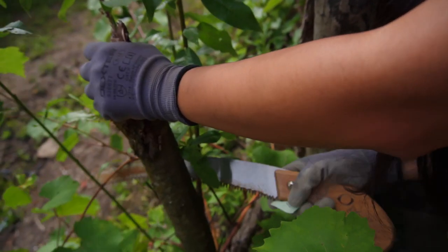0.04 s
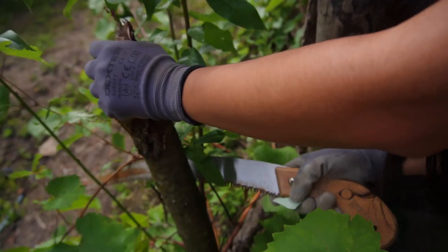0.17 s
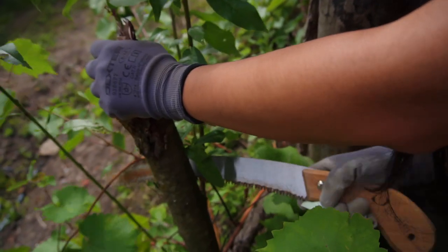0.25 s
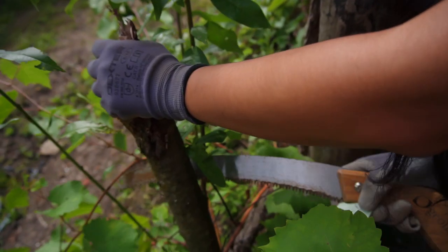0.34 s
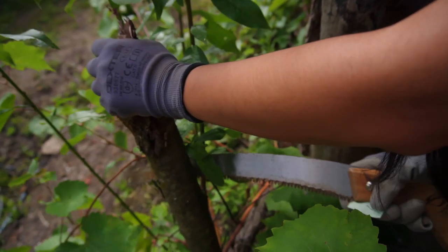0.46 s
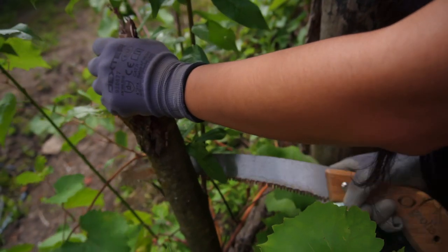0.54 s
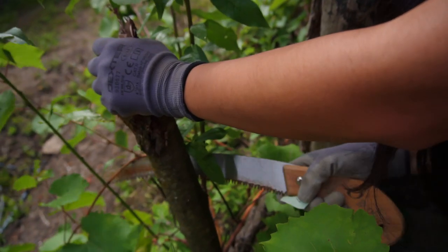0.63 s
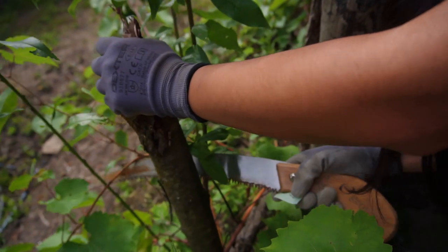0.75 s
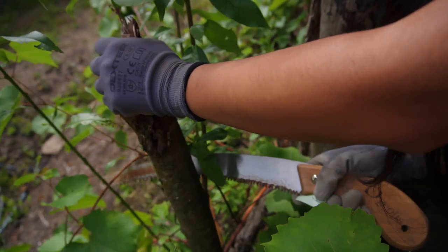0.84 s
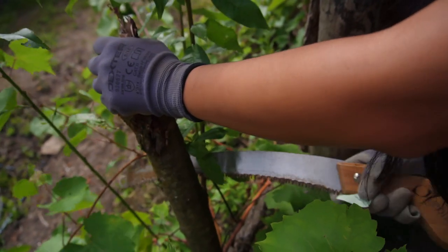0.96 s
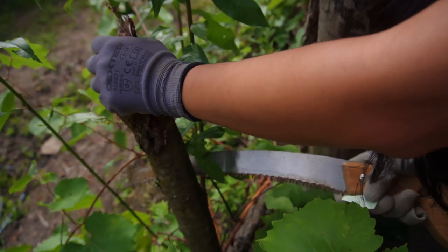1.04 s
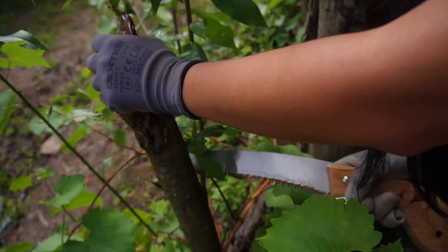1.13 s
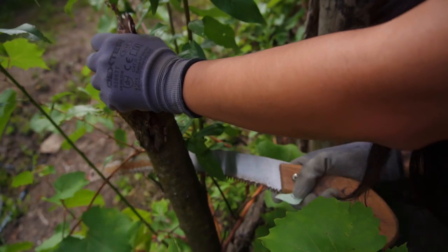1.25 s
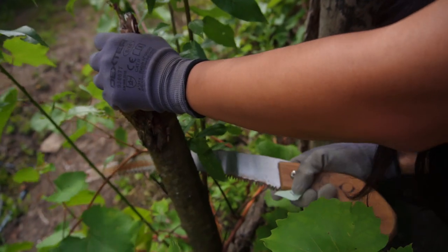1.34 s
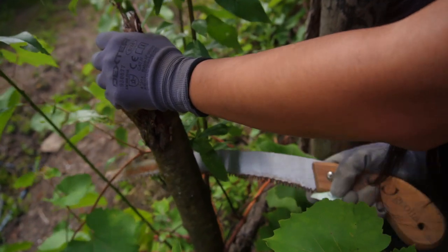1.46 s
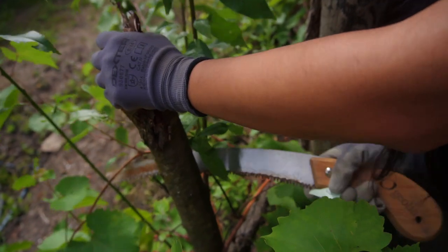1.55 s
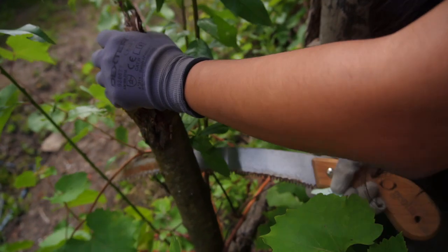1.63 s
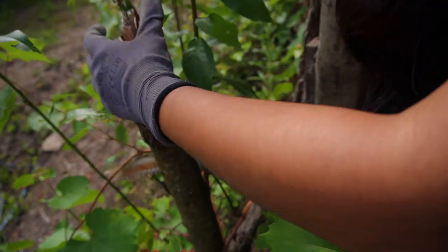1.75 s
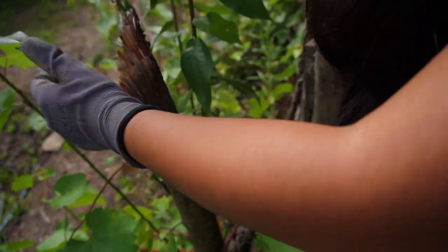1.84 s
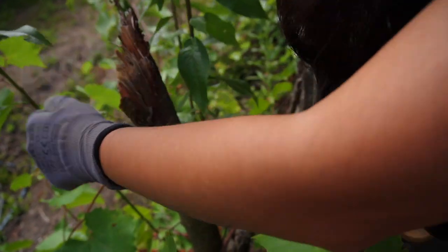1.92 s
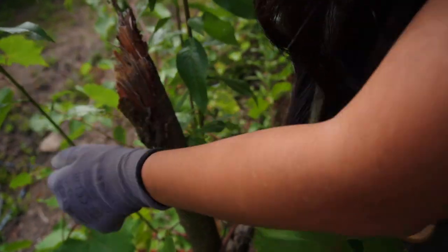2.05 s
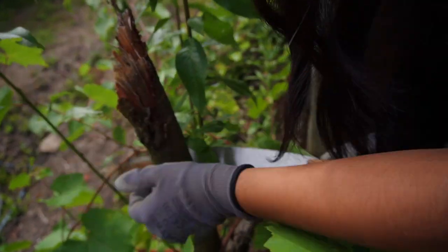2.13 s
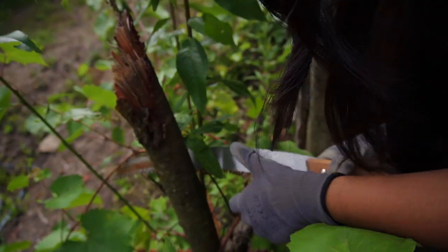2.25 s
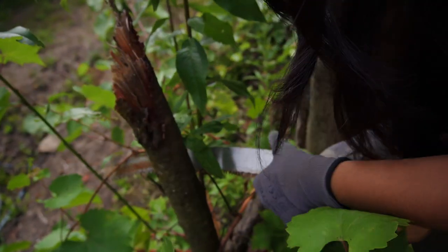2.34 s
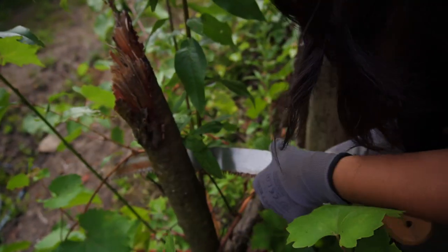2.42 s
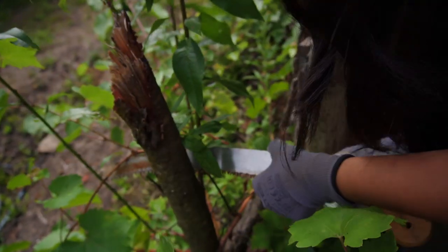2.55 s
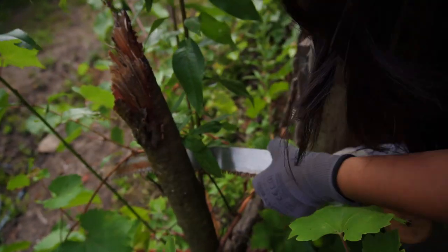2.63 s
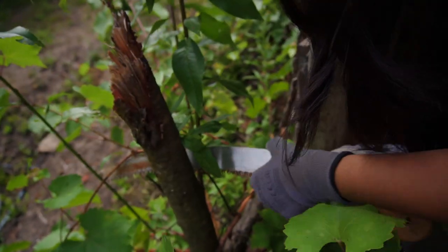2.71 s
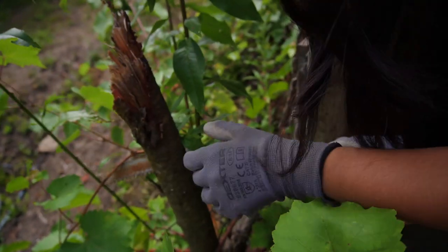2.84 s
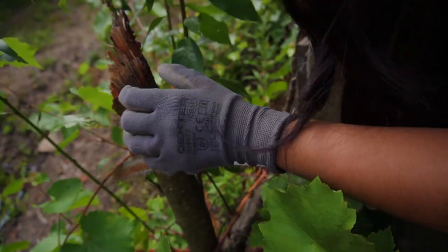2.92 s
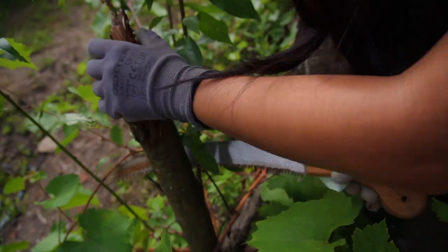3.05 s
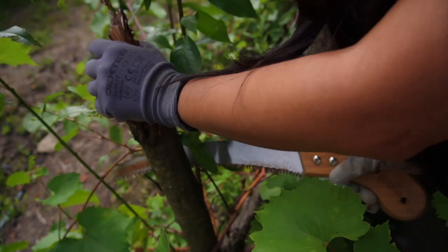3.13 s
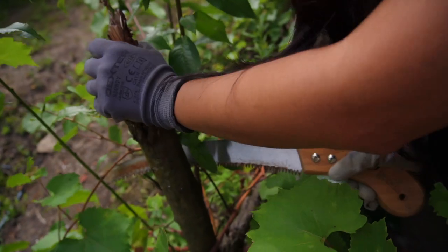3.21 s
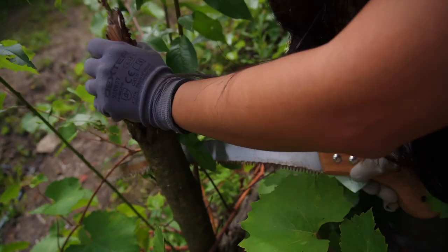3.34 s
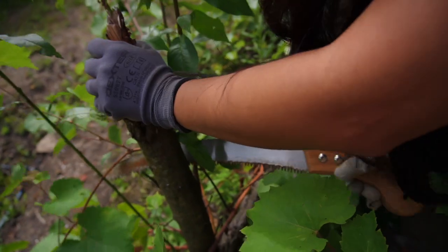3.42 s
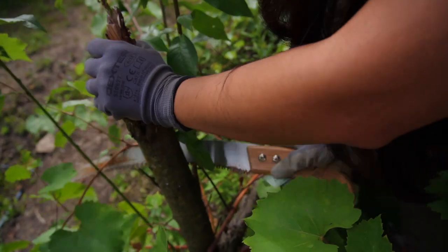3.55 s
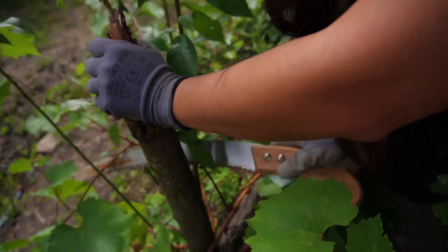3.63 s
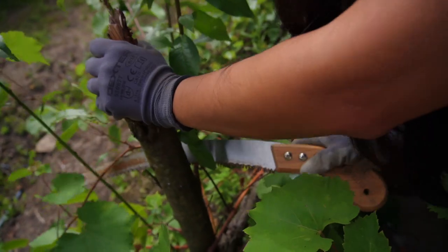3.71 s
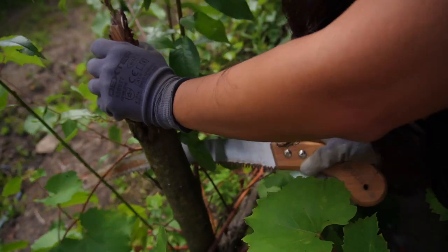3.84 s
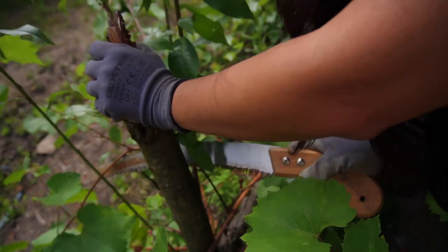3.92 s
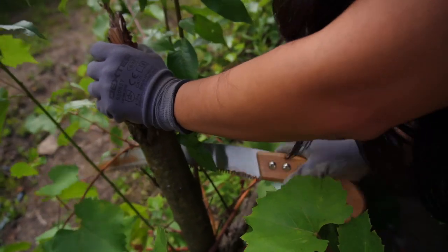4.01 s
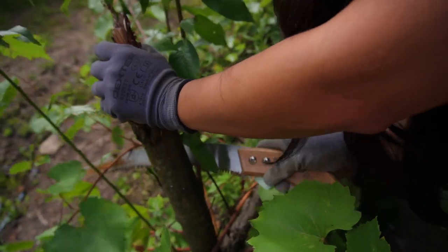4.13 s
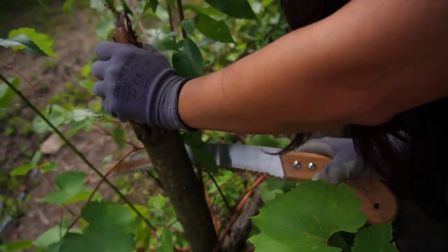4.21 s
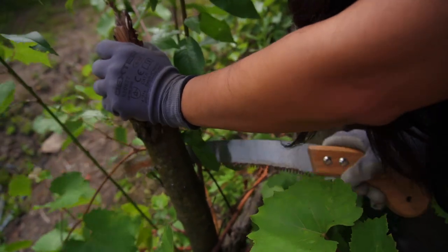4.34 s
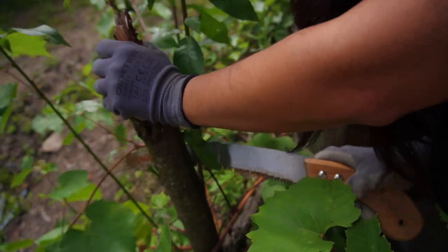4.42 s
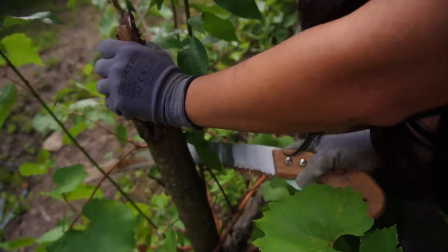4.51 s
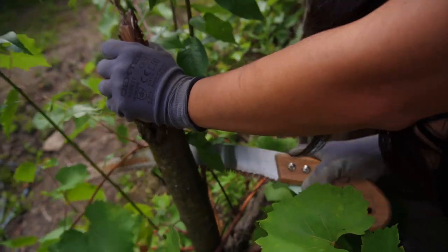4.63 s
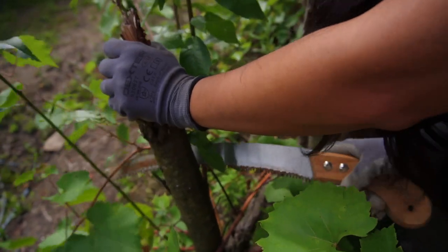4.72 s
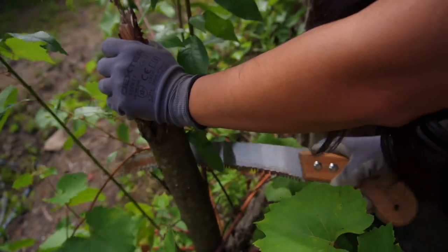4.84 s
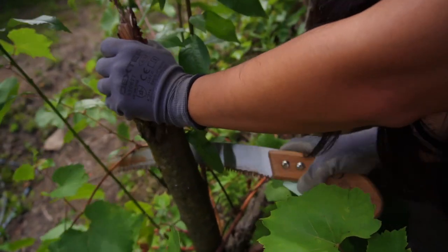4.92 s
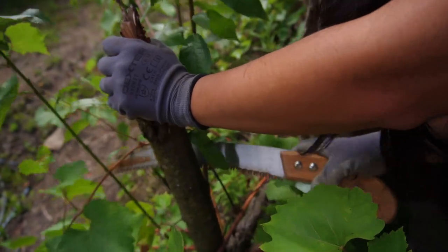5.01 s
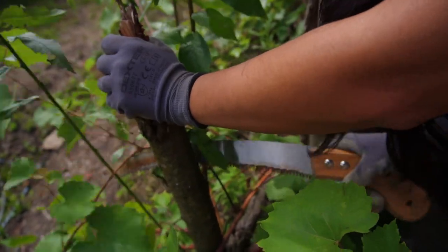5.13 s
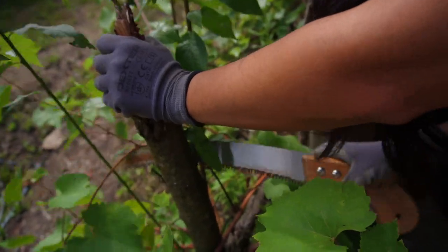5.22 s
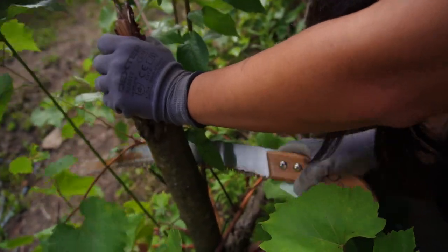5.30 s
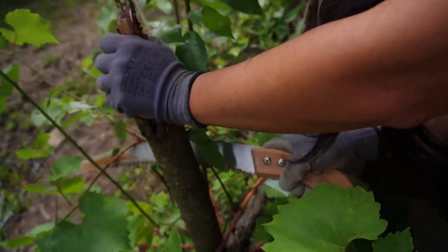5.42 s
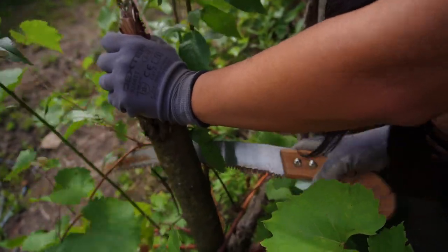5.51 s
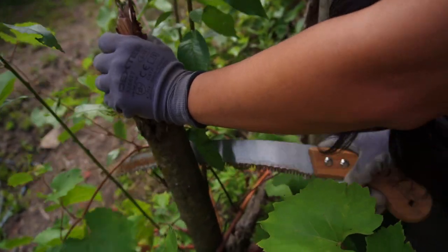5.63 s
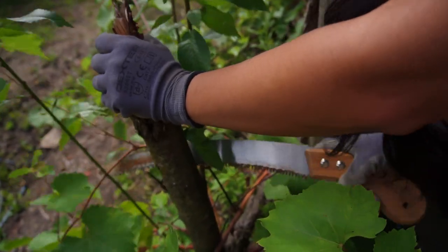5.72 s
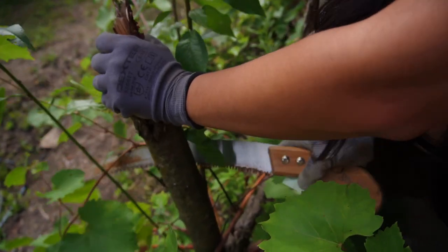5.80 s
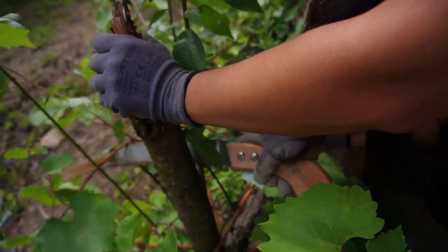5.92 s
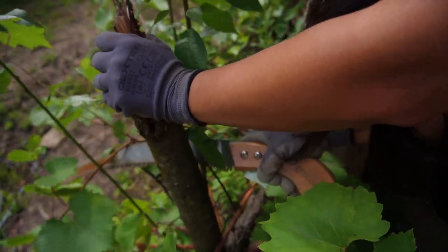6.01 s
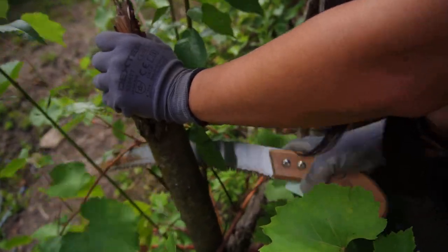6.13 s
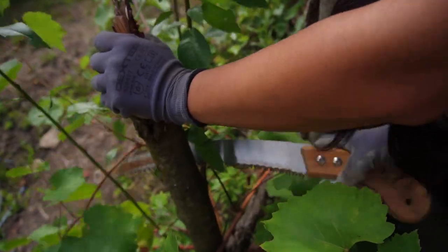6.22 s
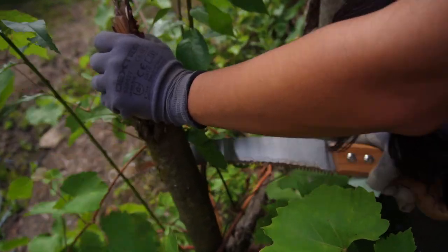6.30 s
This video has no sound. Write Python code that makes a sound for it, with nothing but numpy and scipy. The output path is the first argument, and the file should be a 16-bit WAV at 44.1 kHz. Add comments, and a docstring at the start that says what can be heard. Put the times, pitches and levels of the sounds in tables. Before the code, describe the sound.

A hand saw rasps back and forth through a thin tree trunk, about three strokes a second, with woody knocks and a faint ring from the blade. The sawing pauses while a glove brushes bark and leaves, twigs snap and the blade scrapes once against a twig. Then the quick strokes resume, slightly louder. The microphone is close, in a quiet orchard with faint open air behind.

```python
"""Quick strokes of a hand saw in a thin trunk, close to a mono camera microphone in a quiet orchard.
The teeth catch and let go many times a second; each catch throws out a burst of rasp, rings the blade
and thuds in the wood. In a pause a gloved hand brushes bark and leaves, twigs snap and the idle blade
scrapes a twig; then the sawing goes on. Faint open air lies behind it all."""
import sys
import numpy as np
from scipy import signal
from scipy.io import wavfile
from scipy.ndimage import uniform_filter1d

SR = 44100
rng = np.random.default_rng(int(sys.argv[2]) if len(sys.argv) > 2 else 0)


def generate_wav(signal):
    """Clip the signal to [-1, 1] and save it as 16-bit WAV at the path in sys.argv[1]."""
    frames = np.transpose(np.atleast_2d(signal))
    scaled = np.clip(frames, -1, 1) * 32767
    pcm = np.round(scaled).astype(np.int16)
    wavfile.write(sys.argv[1], SR, pcm)


N = 280512

# spectra of the open air, brushed leaves and rasping teeth: frequency_hz, relative_db
AIR_SPECTRUM = [(8.8, -1.5), (15, 2), (34, -6.5), (59, -20), (294, -17), (330, -43), (371, -15),
                (840, -26.5), (944, -22), (11000, -40.5), (16000, -49)]
LEAF_SPECTRUM = [(300, -31), (650, -1), (1330, 12.5), (2050, 9), (3500, 8), (8990, 2), (10800, -4.5),
                 (14200, -1.5), (16000, -19.5)]
RASP_SPECTRUM = [(530, -25), (900, -3), (967, -4), (1200, -6), (1460, -1), (3260, -5), (4800, -3),
                 (7230, -6.5), (8450, -4), (10500, -14.5), (13800, -10), (16000, -23)]
# modes of the blade and the trunk: pitch_hz, width_hz, relative_db
BLADE_MODES = [(1370, 130, -0.5), (2002, 150, 2.5), (2940, 370, -6), (4955, 110, 2), (5650, 150, 3.5),
               (6660, 71, 0.5), (7900, 140, -22), (8750, 1200, -1.5)]
TRUNK_MODES = [(120, 110, -5), (184, 65, -1.5), (229, 63, -1), (320, 95, 1.5), (465, 103, -1),
               (619, 167, 2), (706, 177, -3.5), (1260, 770, -1)]
# glove on bark and leaves: start_s, rise_s, hold_s, fall_s, level_db, swell_db, dullness_db
GLOVE_BRUSHES = [(1.55, 0.024, 0.8, .2, -62.5, -0.5, -7), (2.6, .05, .15, .05, -63, 1.5, -9),
                 (1.62, 0.13, 0.056, 0.16, -47, -1, -9.5), (2.152, 0.014, 0.048, 0.22, -49, -0.5, -10.5),
                 (2.33, .25, .09, .07, -49.5, -1, -7.5), (2.76, 0.068, 0.021, 0.015, -44.5, 4, -7.5),
                 (2.85, 0.048, 0.096, 0.0084, -56.5, 0.5, -7.5),
                 (2.915, 0.017, 0.0083, 0.063, -51.5, -2, -1), (2.99, 0.03, 0.0065, 0.0051, -49, 7, -14),
                 (3.07, 0.034, 0.047, 0.13, -41.5, -10.5, -8), (3.07, 0.03, 0.28, 0.029, -63, -3.5, -12)]
# twig snaps and hard bites: start_s, body_peak_db, pitch_hz, crack_over_body_db
SNAPS_AND_BITES = [(0.267, -33, 4100, -10), (0.363, -30.5, 730, -16), (0.689, -27.5, 1100, -5),
                   (0.913, -28, 695, -8), (0.964, -29.5, 432, 1), (1.484, -35, 400, -11),
                   (1.502, -33, 600, -24), (1.52, -28, 710, -24), (1.752, -37.5, 4300, 6),
                   (1.776, -29, 1520, 0), (1.801, -38, 2600, 8), (1.817, -31.5, 4875, 8),
                   (1.824, -28, 1540, 3.5), (1.844, -41, 1580, -9), (2.015, -39, 1560, 1.5),
                   (2.021, -35.5, 2400, 2), (2.164, -41.5, 880, 1), (2.224, -45, 1480, 1),
                   (2.285, -47, 3400, -7), (2.34, -52, 1700, -8), (2.413, -46.5, 2330, 3),
                   (2.444, -52, 1920, 3), (2.824, -31, 4500, 1), (2.896, -43.5, 890, -18),
                   (2.933, -31, 3180, -3), (2.939, -34, 3186, -14), (2.991, -42.5, 5270, -1),
                   (3.077, -42, 1810, 9), (3.159, -43, 3560, 7), (3.253, -54.5, 2980, 4),
                   (3.35, -28.5, 1270, -10), (3.36, -33, 1290, -12), (3.595, -27, 1000, -1),
                   (3.695, -32.5, 4500, -1), (3.713, -32.5, 334, -8), (3.771, -30, 716, -8),
                   (3.986, -43, 890, -5), (4.221, -29, 800, -14), (4.26, -35, 4200, -3),
                   (4.27, -29.5, 4120, -3), (4.591, -32.5, 690, -18), (4.924, -37.5, 726, -12),
                   (5.062, -30.5, 1320, -7), (5.075, -30.5, 815, -8), (5.119, -33.5, 910, -7),
                   (5.178, -36.5, 664, -14), (5.258, -33.5, 1150, 6.5), (5.293, -38, 5000, -8),
                   (5.526, -23.5, 1030, -12), (5.549, -24, 4100, -5), (5.567, -25, 940, -12),
                   (5.7, -25.5, 1160, -6), (5.748, -41, 4500, 5), (6.179, -28.5, 605, -15),
                   (6.341, -27.5, 465, -20)]
# saw strokes: start_s, rise_s, hold_s, fall_s, rasp_db, swell_db, deepest_bite_after_s,
# thud_over_rasp_db and shake_db (both at that bite), catches_per_s, ring_over_rasp_db, ring_hz
SAW_STROKES = [(-.08, 0.093, 0.1, 0.11, -44, -1, .17, 1, -56, 67, -19, 4200),
               (.2, 0.044, 0.18, 0.065, -46.5, 5, 0.16, 1.5, -49.5, 61.6, -3.5, 4170),
               (.52, 0.07, 0.12, 0.12, -44.5, -0.5, 0.18, -0.5, -60, 72, -7, 4580),
               (.79, 0.064, 0.19, 0.092, -45.5, 1.5, 0.16, 3.5, -52.5, 50.3, 0, 4220),
               (1.11, 0.075, 0.13, 0.079, -48.5, 0.5, 0.19, 0, -65, 56, -10, 4170),
               (1.39, 0.072, 0.056, 0.083, -45, 1, 0.12, 2, -47.5, 61, -3.5, 4190),
               (3.29, 0.038, 0.034, 0.2, -47.5, -2, 0.058, -0.5, -74, 71, -19, 4000),
               (3.42, 0.066, .11, 0.065, -47.5, 5.5, 0.15, 3.5, -72, 66, -16, 4350),
               (3.65, 0.041, 0.068, 0.21, -46, -2, 0.097, 3.5, -55, 55, -7, 4080),
               (4.022, 0.03, 0.076, 0.053, -48, 4, 0.12, 5.5, -62, 58, 2, 4500),
               (4.17, 0.086, 0.067, 0.064, -37, -4.5, 0.068, -1.5, -53.5, 65, -5.5, 4100),
               (4.46, 0.043, 0.042, 0.17, -44, 2.5, 0.14, -0.5, -68, 59, -23, 4000),
               (4.64, 0.064, 0.09, 0.077, -41.5, -5.5, 0.12, 1, -51, 57.5, -6, 4100),
               (4.85, 0.049, 0.053, 0.083, -45.5, 1, 0.073, -1.5, -64, 55, -7, 4670),
               (5.035, 0.031, 0.12, 0.082, -43.5, -4, .04, -1, -63, 68, -3, 4070),
               (5.25, 0.044, 0.11, 0.052, -43.5, 2.5, 0.13, 0.5, -72, 73, -16, 4600),
               (5.465, 0.041, 0.047, 0.07, -40, -2, 0.099, 5, -53, 63, -7, 4120),
               (5.55, 0.049, 0.084, 0.11, -47, 3, .13, 1, -57, 65, -10, 4140),
               (5.74, 0.073, 0.13, 0.073, -43.5, 1.5, 0.13, 0.5, -69, 84, -17, 4470),
               (6.095, 0.054, 0.062, 0.05, -36.5, -4, 0.098, 3.5, -47.5, 65, -16, 4180),
               (6.17, 0.062, 0.17, 0.1, -42, -2.5, 0.2, -1, -70, 62, -7, 4040)]
# the blade slips as it turns round: start_s, hold_s, rasp_db, thud_over_rasp_db
BLADE_SLIPS = [(0.191, 0.0061, -57, 1), (0.513, 0.0078, -54, -13), (1.105, 0.035, -54.5, -11),
               (1.399, 0.028, -50.5, -11), (3.975, 0.029, -53.5, -10), (4.352, 0.11, -54, -5.5),
               (5.217, 0.029, -46.5, -13.5), (5.427, 0.039, -58.5, -4), (6.019, 0.023, -55, -11)]
# the blade lies in the cut: from_s, to_s
IN_CUT_SPANS = [(0, 1.64), (3.3, 6.4)]

AIR_DB, EDGE_HZ = -66.5, 15800
SLOPE_DB = 22  # climbed in a rise, lost in a fall
KNOCK_DB, KNOCK_UNDER_HZ = -4, 890  # snaps below this pitch knock the trunk
DRAG_DB = -65  # the blade drags faintly while it turns round
THUD_DROP_DB, THUD_SPAN_S, SHAKE_DROP_DB_PER_S = 7.5, 0.065, 111  # either side of the deepest bite
RING_FADE_DB_PER_S = 65  # the ring is brightest as the teeth take hold
SLIP_RISE_S, SLIP_FALL_S, SLIP_CATCHES_PER_S = .01, .045, 78
SLIP_SHAKE_DB, SLIP_RING_DB, SLIP_RING_HZ = -69, -17, 4030
STRAY_CATCHES = 0.1209  # the catches stray this far from an even beat


def gain_of(db):
    """Decibels to amplitude."""
    return 10 ** (np.asarray(db) / 20)


def unit_rms(x):
    """The signal scaled to rms 1."""
    return x / np.sqrt(np.mean(x ** 2) + 1e-20)


def wander(hz):
    """Random drift of rms 1, mostly slower than hz."""
    return unit_rms(signal.lfilter(*signal.butter(2, hz, fs=SR), rng.standard_normal(N)))


def grit(per_s, spread_db, hiss):
    """Sparse clicks of uneven size over a dense hiss."""
    size = gain_of(spread_db * np.minimum(rng.exponential(1, N), 4)) * (rng.random(N) < per_s / SR)
    return unit_rms(unit_rms(size * rng.standard_normal(N)) + hiss * rng.standard_normal(N))


def colour(x, spectrum):
    """Causal filter with the given spectrum."""
    hz, db = np.transpose(spectrum)
    log_hz = np.log(abs(np.fft.fftfreq(4096, 1 / SR)) + 1)
    log_gain = np.interp(log_hz, np.log(hz), db) * np.log(10) / 20
    taps = np.fft.ifft(np.exp(np.conj(signal.hilbert(log_gain)))).real[:2048]
    return signal.oaconvolve(x, taps)[:len(x)]


def resonate(x, hz, width_hz):
    """One resonance whose pitch may move: shift hz down to zero, smooth, shift back."""
    carrier = np.exp(2j * np.pi * np.cumsum(hz * np.ones(len(x))) / SR)
    pole = np.exp(-np.pi * width_hz / SR)
    return 2 * (carrier * signal.lfilter([1 - pole], [1, -pole], x / carrier)).real


def ring(x, modes, fits_db, fits_hz):
    """A body's modes; each takes up the drive in fits of its own as the contact point moves."""
    out = 0
    for hz, width, db in modes:
        sections = np.tile(np.concatenate(signal.iirpeak(hz, hz / width, SR)), (2, 1))  # steep flanks
        drive = x * gain_of(fits_db * wander(fits_hz))
        out = out + gain_of(db) * unit_rms(signal.sosfilt(sections, drive))
    return unit_rms(out)


def patchy(x, db):
    """Tearing fibres light up now one band, now another, for a few milliseconds."""
    bands = signal.stft(x, nperseg=128, noverlap=96)[2]
    patches = uniform_filter1d(rng.standard_normal(bands.shape), size=5, axis=0)
    patches = unit_rms(uniform_filter1d(patches, size=7, axis=1))
    return unit_rms(signal.istft(bands * gain_of(db * patches), nperseg=128, noverlap=96)[1][:N])


def gestures(rows):
    """The loudest gesture at each millisecond: its level in dB, the time since its start, its row."""
    t = np.arange(0, N / SR + .002, .001)[:, None]
    start, rise, hold, fall, db, swell_db = np.transpose(rows)[:6]
    since = t - start
    through_hold = np.clip((since - rise) / hold, 0, 1)
    flanks = np.maximum(1 - since / rise, 0) + np.maximum(since - rise - hold, 0) / fall
    level_db = db + swell_db * through_hold - SLOPE_DB * flanks
    loudest = level_db.argmax(axis=1)
    return level_db.max(axis=1), t[:, 0] - start[loudest], np.array(rows)[loudest].T


def smoothed(control):
    """A control in millisecond steps, smoothed and drawn out to every sample."""
    return np.interp(np.arange(N) / SR * 1000, np.arange(len(control)), uniform_filter1d(control, 7))


def held(control):
    """A control in millisecond steps, held over the samples of each step."""
    return control[np.arange(N) * 1000 // SR]


def orchard_air():
    """Faint steady hiss and a lumpy low stir of the open air."""
    return gain_of(AIR_DB + 0.78 * wander(8.3)) * unit_rms(colour(rng.standard_normal(N), AIR_SPECTRUM))


def glove_rustle():
    """A glove on bark and leaves crackles in clumps; each brush has its own share of dull, low rustle."""
    level_db, _, row = gestures(GLOVE_BRUSHES)
    level, dull_db = smoothed(gain_of(level_db)), smoothed(row[6])
    crackle = grit(per_s=2000, spread_db=2.4, hiss=1.5) * gain_of(2.2 * wander(60))
    low = unit_rms(resonate(resonate(crackle, 970, 1090), 970, 1090))
    return level * (patchy(colour(crackle, LEAF_SPECTRUM), db=2.0) + gain_of(dull_db + 3.0) * low)


def snaps(width_hz=650):
    """Twigs snap and teeth bite: a brief woody ring under a wide crack; low ones also knock the trunk."""
    out, t = np.zeros(N + SR), np.arange(1800) / SR
    modes_hz, widths_hz, modes_db = np.transpose(TRUNK_MODES)[:, :, None]
    trunk_tones = np.exp(-np.pi * widths_hz * t) * np.sin(2 * np.pi * modes_hz * t)
    noises = rng.standard_normal((len(SNAPS_AND_BITES), len(t)))
    for (start_s, db, hz, crack_db), noise in zip(SNAPS_AND_BITES, noises):
        crack = colour(noise * np.exp(-t / .0014), LEAF_SPECTRUM)
        burst = noise * np.exp(-t / (.0008 + .5 / hz))
        body = resonate(resonate(burst, hz, width_hz), hz, 2 * width_hz)
        knock = (gain_of(modes_db + 4 * rng.standard_normal(modes_db.shape)) * trunk_tones).sum(axis=0)
        knock_gain = gain_of(KNOCK_DB) / (1 + (hz / KNOCK_UNDER_HZ) ** 6)
        crack, body, knock = (x / abs(x).max() for x in (crack, body, knock))
        snap = gain_of(crack_db) * crack + body + knock_gain * knock
        out[round(start_s * SR):][:len(t)] += gain_of(db) * snap
    return out[:N]


def blade_scrape(start_s=2.822, level_db=-41.5):
    """The idle blade scrapes a twig and rings freely."""
    t = np.arange(N) / SR - start_s
    scrape = rng.standard_normal(N) * (t > 0) * np.exp(-abs(t) / 0.012)
    rung = ring(scrape, BLADE_MODES + [(4030, 110, 6.9)], fits_db=0.5, fits_hz=25)
    onset_rms = np.sqrt(np.mean(rung[(t > 0) & (t < .03)] ** 2))
    return gain_of(level_db) * rung / onset_rms


def saw_motion():
    """The stroke or slip in hand sets rasp, thud, shake, ring, ring pitch and the count of catches."""
    slips = [(start_s, SLIP_RISE_S, hold_s, SLIP_FALL_S, db, 0, SLIP_RISE_S, thud_db, SLIP_SHAKE_DB,
              SLIP_CATCHES_PER_S, SLIP_RING_DB, SLIP_RING_HZ)
             for start_s, hold_s, db, thud_db in BLADE_SLIPS]
    rasp_db, since, row = gestures(SAW_STROKES + slips)
    start, rise = row[:2]
    deepest, thud_db, shake_db, per_s, ring_db, ring_hz = row[6:]
    t, from_bite = start + since, abs(since - deepest)
    in_cut = sum((t >= from_s) & (t <= to_s) for from_s, to_s in IN_CUT_SPANS)
    rasp_gain = np.maximum(gain_of(rasp_db), gain_of(DRAG_DB)) * in_cut
    thud_db = thud_db - THUD_DROP_DB * np.minimum(from_bite / THUD_SPAN_S, 1)
    shake_gain = gain_of(shake_db - SHAKE_DROP_DB_PER_S * from_bite)
    ring_gain = gain_of(rasp_db + ring_db - RING_FADE_DB_PER_S * np.maximum(since - rise, 0))
    # the count is whole at the deepest bite and runs on from stroke to stroke
    count_at_bite = 20 + 100 * held(start) // 1
    catches = count_at_bite + held(per_s) * (np.arange(N) / SR - held(start + deepest))
    return *map(smoothed, (rasp_gain, thud_db, shake_gain, ring_gain, ring_hz)), catches


def hand_saw():
    """Each catch of the teeth drives rasp, blade and trunk with one burst of grit."""
    rasp_gain, thud_db, shake_gain, ring_gain, ring_hz, catches = saw_motion()
    catches = catches + STRAY_CATCHES * wander(11.94)
    strength = gain_of(1.5 * rng.standard_normal(1000))[catches.astype(int)]
    phase = catches % 1
    burst = unit_rms(0.6 + strength * np.minimum(phase / 0.27, 1) * np.exp(-phase / 0.49))
    teeth = grit(per_s=5000, spread_db=0.0, hiss=1.4) * burst
    tearing = patchy(colour(teeth, RASP_SPECTRUM), db=2.8)
    blade = ring(teeth, BLADE_MODES, fits_db=5.0, fits_hz=25)
    rasp = unit_rms(tearing + .17 * blade) * gain_of(-0.5)
    # the strongest mode sings in fits and shifts as the blade's free length changes
    fits = gain_of(4 * wander(35))
    sing = unit_rms(resonate(teeth * burst * fits, ring_hz, width_hz=115))
    # the wood takes one blow at each catch, among looser knocks
    blows = unit_rms(strength * (np.diff(catches // 1, prepend=0) > 0))
    knocks = grit(per_s=900, spread_db=2.0, hiss=0.92) * burst ** 2.3 + 0.97 * blows
    thud = ring(knocks, TRUNK_MODES, fits_db=4.0, fits_hz=32.0) * gain_of(thud_db)
    # the trunk sways once a catch, with a weaker second harmonic
    sway = unit_rms(np.sin(2 * np.pi * catches) + 0.69 * np.sin(4 * np.pi * catches))
    sway *= gain_of(3.0 * wander(11.0))
    biting = np.tanh(rasp_gain / gain_of(-52))  # ring and sway fall silent once the teeth let go
    return rasp_gain * (rasp + thud) + biting * (ring_gain * sing + shake_gain * sway)


def scene():
    """Work close to the microphone; ground and foliage throw a little back, with open air behind."""
    near = hand_saw() + glove_rustle() + snaps() + blade_scrape()
    t = np.arange(2600) / SR
    scatter = rng.standard_normal(len(t)) * np.exp(-t / 0.015) * (t > .002)
    reflections = signal.oaconvolve(near, scatter / np.linalg.norm(scatter))[:N]
    mono = near + gain_of(-16.0) * reflections + orchard_air()
    return np.array([mono, mono])


def record(dry):
    """The camera's sound stops at EDGE_HZ."""
    return signal.oaconvolve(dry, signal.firwin(511, EDGE_HZ, window=("kaiser", 9), fs=SR)[None], "same")


dry = scene()
out = record(dry)
generate_wav(out)
```